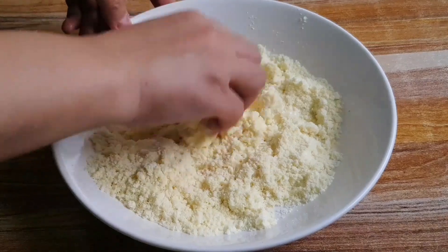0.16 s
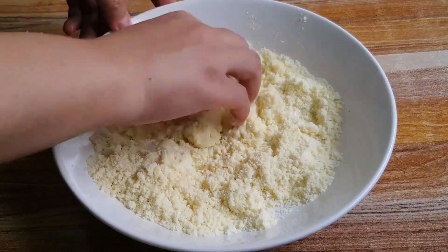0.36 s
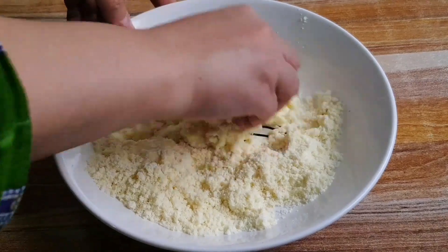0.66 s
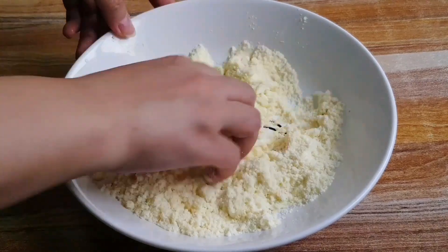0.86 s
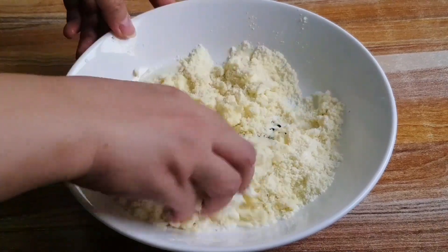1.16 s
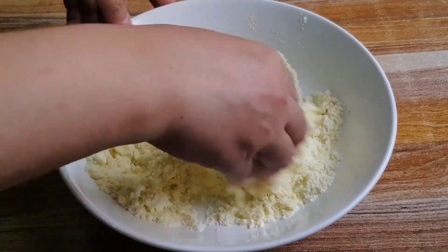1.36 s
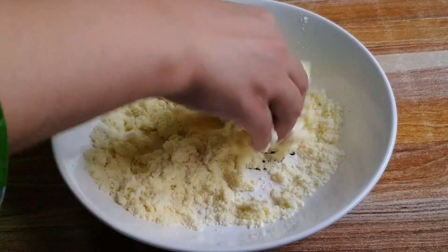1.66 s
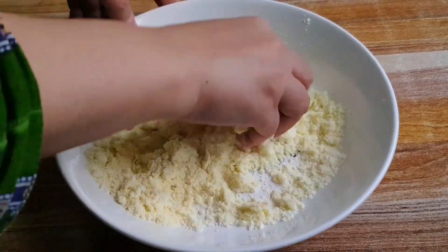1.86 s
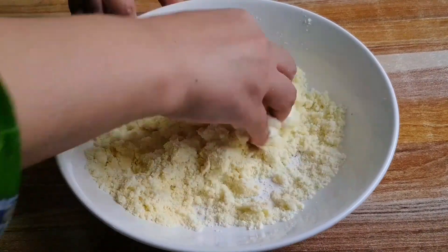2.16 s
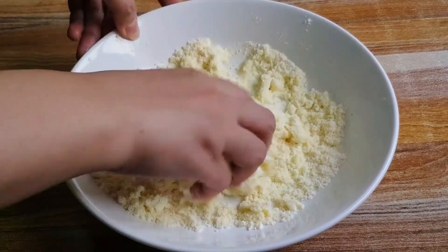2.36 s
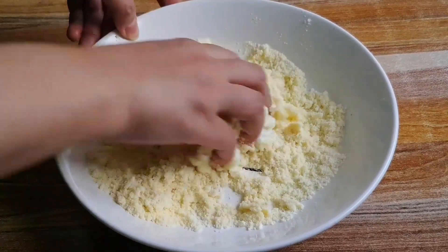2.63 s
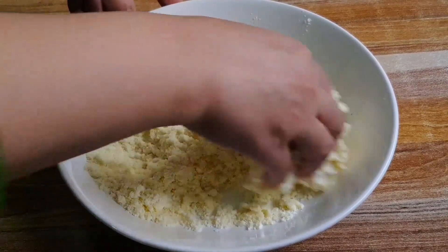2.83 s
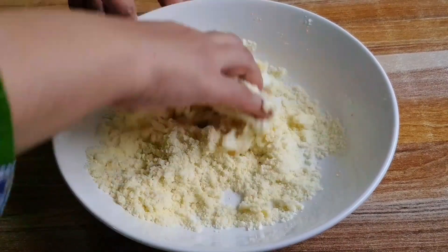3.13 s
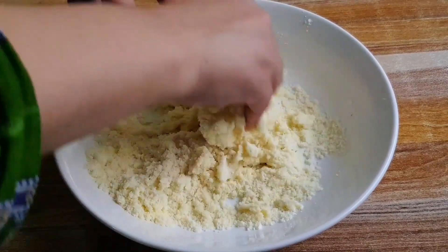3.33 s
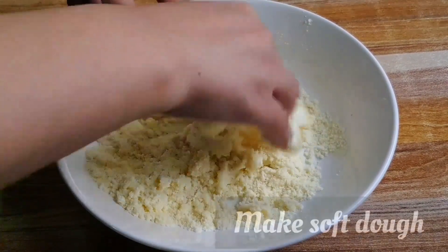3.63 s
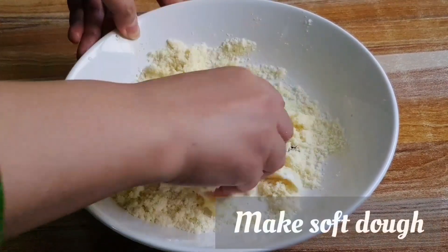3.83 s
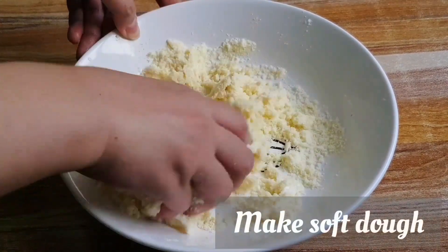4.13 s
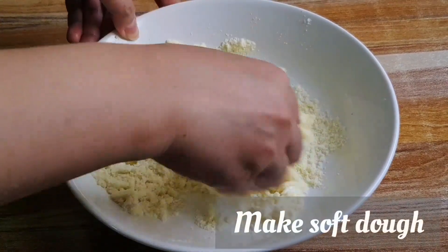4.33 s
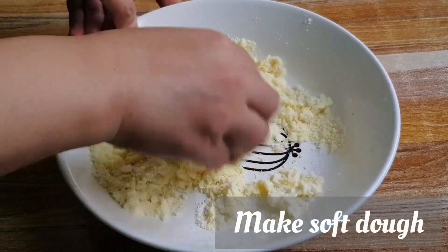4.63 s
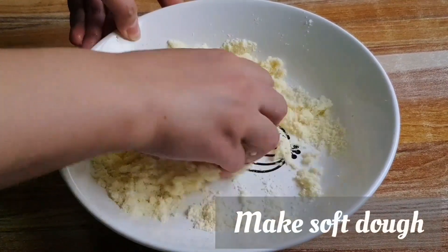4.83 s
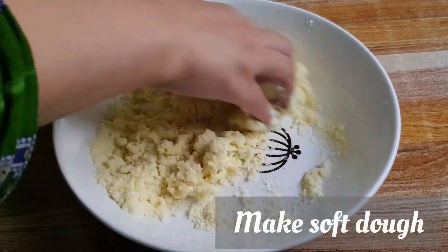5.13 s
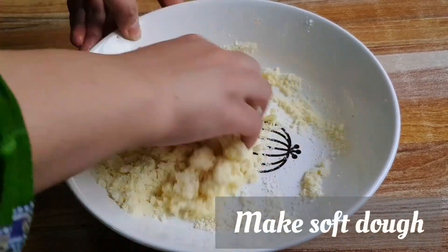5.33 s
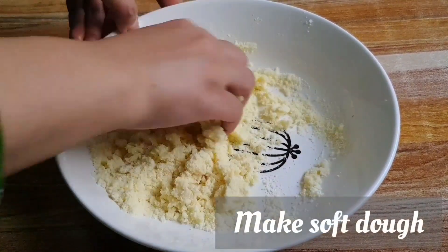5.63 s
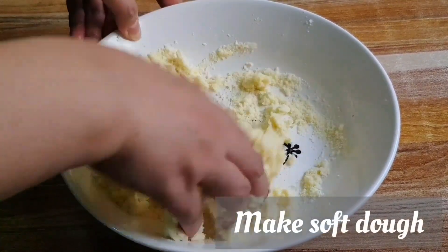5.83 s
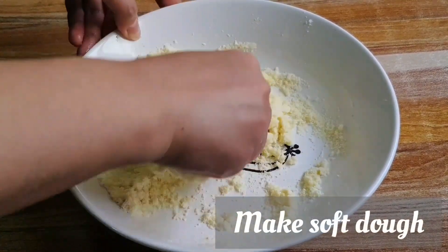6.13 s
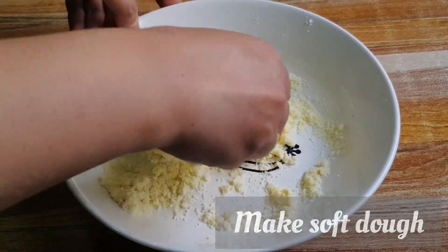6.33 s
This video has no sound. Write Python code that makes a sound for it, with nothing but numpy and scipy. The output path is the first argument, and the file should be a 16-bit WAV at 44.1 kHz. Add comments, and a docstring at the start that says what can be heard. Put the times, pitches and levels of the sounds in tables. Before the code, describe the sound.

From the start, fingers rub crumbly dough in a ceramic bowl, making soft, grainy rustles about three or four times a second. Behind them a small kitchen holds a low, wavering appliance hum, dull room noise, a faint hiss and a thin whine toward the right, with occasional very faint high peeps. The bowl taps lightly on a wooden table at 0.7 seconds, then rocks in a quick run of dull, hollow knocks from 1.5 to 1.7 seconds. One knock follows at 3 seconds. Between 3.7 and 5.2 seconds the knocks come in clusters, strongest around 4.5 and 5.1 seconds, some with a small crumble of breaking lumps. The knocks are close, short and barely ringing, clearly louder than the rustling. Afterward the quiet rubbing continues, with light scatters of crumbs around 5.8 and 6.2 seconds, ending at about 6.5 seconds.

```python
"""A hand rubs crumbly dough around a ceramic bowl on a wooden table in a small kitchen.
From the start, friction makes the crumbs rustle softly over an appliance's hum and whine, room noise,
a faint high hiss and occasional faint peeps. The pushed bowl taps at 0.7 s, rocks around 1.5 s and knocks
once at 3 s; each dull impact excites the modes of bowl and table. From 3.7 to 5.2 s the knocks come in
clusters, then the rubbing goes on with a last scatter of crumbs."""
import sys
import numpy as np
from scipy import signal
from scipy.fft import rfft, irfft
from scipy.io import wavfile

SR = 44100
rng = np.random.default_rng(int(sys.argv[2]) if len(sys.argv) > 2 else 0)


def pcm_store(signal):
    """Save signal as 16-bit PCM."""
    levels = np.round(np.clip(np.atleast_2d(signal), -1, 1) * 32767)
    wavfile.write(sys.argv[1], SR, levels.astype(np.int16).T)


N = 285768
T, HZ = np.arange(N) / SR, np.fft.rfftfreq(N, 1 / SR)


# Impacts of bowl on table: start_s, level_db, pitch_hz, thud_gain_db, room_gain_db, ring_gain_db,
# hollow_gain_db, tick_gain_db, ring_time_factor, thud_hz, main_mode_gain_db
IMPACTS = [(.703, -46, 650, -14, -13, -7, -10, -24, .8, 100, 2),
           (1.465, -31.5, 325, -1, -2.5, -6, 4, -16, 0.63, 108, -7),
           (1.481, -41.5, 260, 17.5, -8, -11, -6, -30, .59, 104, 0),
           (1.545, -27, 524, 6.5, 2.5, -6, -1, -33, .89, 103, 3),
           (1.578, -36, 474, 9, 3, 7, 5.5, -30, 0.51, 105, 0),
           (1.595, -40, 497, -2, -20, -10, 0, -32, 0.71, 109, -3),
           (1.706, -28, 396, 1.5, -1, -3.5, 4, -10.5, 1.06, 111, 1),
           (2.9824, -26.5, 556, 1, -5, -8.5, -3, -37, 1.14, 101, 5),
           (3.74, -34.5, 396, -3, -4, -2, -4, -23, 1.1, 90, -8),
           (3.843, -32.5, 496, 5, 1, 0.5, 2.5, -13, 0.85, 96, -6),
           (3.8559, -35, 620, 9.5, -4, -9, 0, -19, 0.76, 97, 0),
           (3.894, -41.5, 546, 1, 4, 1, 1, -36, 1.1, 95, 0),
           (4.104, -43, 282, 16.5, 2, 4, -5, -28, 0.85, 87, 12),
           (4.1225, -50, 356, -2, 12, -6, -10, -30, 1, 89.5, 0),
           (4.254, -33.5, 437, 5.5, -8.5, -2, -1, -20, .59, 85, -5),
           (4.403, -30, 420, -12, 0.5, 3, 10.5, -11.5, 0.57, 100, 1.5),
           (4.5271, -23, 576, -0.5, -5.5, -7, -9, -28, 0.99, 85, -11),
           (5.063, -39.5, 445, 6, 1, 5.5, 0, -11, 0.94, 94, -7),
           (5.148, -24, 640, 1, -2, -0.5, -3, -34, 0.86, 88.5, 6),
           (5.156, -32.5, 800, -12, -6, -4, -15, -18, 0.64, 95, 0),
           (5.182, -37, 520, 3, -8, 3, 5, -30, 0.79, 96, 4),
           (5.216, -39.5, 600, 4, -5, -2, 8, -30, 0.69, 95, 0)]
# Modes of the standing bowl: pitch_hz, gain_db, t60_s (before ring_time_factor)
BOWL_MODES = [(116, -7, .12), (200, -14, .1), (235, -8, .14), (285, -11, .14), (335, -9, .12),
              (409, -18, .16), (450, -19, .12), (1400, -13, .022), (501, -23, .17), (530, -22, .19),
              (690, -21, .12), (783, -21, .17), (918, -26, .2), (1090, -26, .18)]
# Modes of the hollow table top: pitch_hz, gain_db, t60_s
TABLE_MODES = [(224.6, -10.5, 0.17), (253, -13, 0.33), (308, -16.5, 0.2), (336.3, -11, 0.16)]
# Early reflections from walls and worktop: delay_s, signed_gain
REFLECTIONS = [(.0056, -0.32), (.0073, 0.083), (.0083, 0.14), (.0092, 0.057), (.0108, 0.055),
               (0.0126, 0.12), (.0195, -0.21), (.027, -0.043), (.036, 0.15)]
# Direct sound at the left and right microphone: gain_db
DIRECT_GAINS = [
    [0],
    [-2],
]

def bowl_knocks(thud_rise_s=.013, ring_rise_s=.00044, hollow_rise_s=.0042, tick_hz=1270, tick_s=.00094):
    """Impact excitation: each blow sets bowl and table into damped free vibration, and the walls echo."""
    lead_s = .004
    t = np.arange(SR // 2) / SR - lead_s
    age = np.maximum(t, 0)
    out = np.zeros((2, N))
    for (start_s, level_db, pitch_hz, thud_db, room_db, ring_db,
         hollow_db, tick_db, ring_time_factor, thud_hz, main_mode_db) in IMPACTS:
        # the dry tick of the bowl's foot
        tick = amp(tick_db) * np.exp(-(t / tick_s) ** 2) * np.cos(2 * np.pi * tick_hz * t)
        pulse = contact_pulse(t, pitch_hz) + tick
        direct = (contact_pulse(t, pitch_hz, force_share=.16) + tick) * amp(DIRECT_GAINS)
        # each mode is driven by the pulse's spectrum at its own frequency
        spectrum = abs(rfft(pulse))
        drive = spectrum / spectrum.max()
        bowl = BOWL_MODES + [(627, -14.5 + main_mode_db, .18)]  # the main mode varies with the spot hit
        modes = []
        for hz, db, t60 in bowl:
            decay = amp(db - 60 * age / (t60 * ring_time_factor))  # the hand's grip sets the damping
            modes.append(decay * drive[int(hz * len(t) / SR)] * np.cos(2 * np.pi * hz * age))
        weights = rng.uniform(.7, 1.3, len(bowl))  # the bowl lands on another spot of its foot each time
        ring = amp(ring_db) * (weights @ np.array(modes)) * onset(age, ring_rise_s)
        # the heavy table top takes a cycle or two to get going
        swell = age / thud_rise_s
        thud = amp(thud_db - 9) * (swell * np.exp(1 - swell)) ** 2 * np.cos(2 * np.pi * thud_hz * age)
        hollow = sum(amp(db - 60 * age / t60) * np.cos(2 * np.pi * (hz * age + rng.random()))
                     for hz, db, t60 in TABLE_MODES)
        hollow = amp(hollow_db) * hollow * onset(age, hollow_rise_s)
        echoes = sum(gain * contact_pulse(t - delay_s, pitch_hz) for delay_s, gain in REFLECTIONS)
        room = amp(room_db) * (echoes + reverberation(pulse[None], gain_db=-3))
        add(out, start_s - lead_s, amp(level_db) * (direct + thud + hollow + ring + room))
    # a high-pass keeps the knocks free of DC offset and deep rumble
    return signal.sosfilt(signal.butter(2, 28, "highpass", fs=SR, output="sos"), out)


def contact_pulse(t, pitch_hz, force_share=0, cutoff_hz=1900, smoothness=30):
    """Radiation: a cushioned force is heard as its second derivative and, close by, partly as itself."""
    pulse_time = np.maximum(smoothness - .7 + t * 2 * np.pi * pitch_hz / np.sqrt(2 / (smoothness - 1)), 0)
    force = pulse_time ** smoothness * np.exp(-pulse_time)
    pressure = -np.gradient(np.gradient(force))
    pressure = low_pass(pressure, cutoff_hz, order=8)  # the dough damps the bowl's treble
    return pressure / pressure.max() + force_share * force / force.max()


# Finger strokes through the dough: peak_s, level_db, length_s, coarse_gain_db, flour_gain_db
STROKE_PEAKS = [(0.12, -65, 0.083, -4, -2), (.34, -77, .08, -2, 2), (.58, -73.5, .081, -1, -5),
                (0.84, -77, 0.15, -2, -6), (1.155, -71.5, 0.13, -1.5, -4), (1.473, -69, .1, -4.5, -7),
                (1.577, -73.5, .06, 5, -4), (1.74, -69, 0.16, -1, 0), (1.89, -84, .06, 3, -2),
                (2.048, -69.5, 0.12, 0.5, 0), (2.334, -71, .17, -1, -4), (2.658, -75, 0.17, 1, -2),
                (2.94, -68.5, .18, -6, -2), (3.196, -74, 0.23, -4, -2), (3.49, -74.5, 0.12, 1, 1),
                (3.776, -72.5, 0.19, -0.5, -6), (3.96, -81, 0.17, -1, 9), (4.144, -69.5, .21, -3.5, -3),
                (4.482, -68.5, 0.14, 0.5, -1), (4.779, -67, 0.13, -3.5, -3),
                (5.11, -70.5, 0.35, -0.5, -1.5), (5.296, -73, .11, -7, -3), (5.597, -76.5, 0.24, -1, -1),
                (5.933, -69, 0.26, -6, -4), (6.217, -68, 0.098, -3, -2), (6.37, -78, .05, -3, 10)]

def finger_strokes(coarse=False, flour=False, press_share=.41, roundness=1.8, resting_db=-96):
    """Incoherent sources add in power: the envelope of strokes that each press in and let go."""
    power = amp(resting_db) ** 2
    for peak_s, level_db, length_s, coarse_db, flour_db in STROKE_PEAKS:
        from_peak = np.maximum((peak_s - T) / press_share, (T - peak_s) / (1 - press_share)) / length_s
        peak = amp(level_db + coarse * coarse_db + flour * flour_db)
        power = power + (peak * np.exp(-np.minimum(from_peak, 10) ** roundness)) ** 2
    return np.sqrt(power)


# Spectrum of rubbed crumbs: frequency_hz, gain_db
RUSTLE_SPECTRUM = [(500, -31), (1200, 2.5), (2200, 0), (2700, -1.5), (3300, 2.5), (4550, -4), (4950, 5),
                   (5600, 1), (6750, 2.5), (7250, 0.5), (7850, -1.5), (8600, 3), (9300, -2.5), (13000, 3.5),
                   (16000, -10.5)]

def dough_rustle(gain_db=4, clump_db=1.8, coarse_below_hz=4270, flour_above_hz=9800):
    """Friction noise: crumbs slip under the fingers in uneven clumps, and finer grains sound higher."""
    rustle = colour(crumb_slips(per_s=3500, spread_db=-.5), RUSTLE_SPECTRUM) * amp(clump_db * drift(27))
    coarse = low_pass(rustle, coarse_below_hz, order=6)
    flour = rustle - low_pass(rustle, flour_above_hz, order=12)
    small = rustle - coarse - flour
    return amp(gain_db) * (coarse * finger_strokes(coarse=True) + small * finger_strokes()
                           + flour * finger_strokes(flour=True))


# Lumps that break: start_s, level_db, rise_s, t60_s, centre_hz, width_octaves
LUMP_BREAKS = [(.095, -57, 0.021, 0.15, 11000, 0.67), (1.09, -58, .02, 0.2, 12000, 0.71),
               (1.545, -65, .004, 0.18, 1700, 0.93), (1.703, -59, .002, 0.26, 4300, 0.97),
               (1.702, -61, 0.0035, 0.14, 11000, 0.63), (3.69, -59, 0.022, 0.26, 11700, 0.63),
               (3.842, -64, .004, 0.14, 2190, 0.91), (4.514, -55.5, .004, 0.4, 4370, 0.68),
               (4.527, -59, 0.0036, .12, 1800, 0.6), (4.78, -59, .005, 0.085, 3200, 0.89),
               (5.151, -51, .003, 0.048, 1700, 0.51), (5.83, -55, 0.033, 0.35, 11900, 0.84),
               (5.93, -64.5, .015, 0.36, 2860, 0.68), (6.18, -56, 0.024, .22, 12000, .6)]

def breaking_lumps():
    """Fracture: each lump scatters crumbs over the glaze in a decaying burst of band-limited noise."""
    scatter = rfft(crumb_slips(per_s=9000, spread_db=3))
    out = np.zeros((2, N))
    for start_s, level_db, rise_s, t60_s, centre_hz, width_octaves in LUMP_BREAKS:
        age = np.maximum(T - start_s, 0)
        band = np.exp(-(np.log2((HZ + 1) / centre_hz) / width_octaves) ** 2)
        out += amp(level_db - 60 * age / t60_s) * onset(age, rise_s) * unit(irfft(scatter * band, N))
    return out


def crumb_slips(per_s, spread_db):
    """A Poisson process: tiny slips of uneven size reach each microphone as random impulses."""
    size = amp(spread_db * np.minimum(rng.exponential(1, (2, N)), 4))
    return unit(size * rng.standard_normal((2, N)) * (rng.random((2, N)) < per_s / SR))


# Spectrum of the kitchen's reverberation: frequency_hz, gain_db
REVERB_SPECTRUM = [(100, -5), (200, 18.5), (330, 4.5), (480, 5.5), (700, 1.5), (1000, 3), (1300, -2.5),
                   (2000, 14), (4000, -2.5), (14000, -19)]
# Its decay times: frequency_hz, t60_s
REVERB_TIMES = [(100, 0.34), (300, 0.2), (700, 0.26), (2000, 0.22), (8000, 0.21)]

def reverberation(sound, gain_db, gap_s=.00475, build_s=.00053):
    """Reverberation: dense reflections build up after a gap and decay exponentially in each band."""
    hz, t, bands = signal.stft(diffuse_field(SR // 2), SR, nperseg=256)
    decay = amp(at_frequency(REVERB_SPECTRUM, hz)[:, None]
                - 60 * t / at_frequency(REVERB_TIMES, hz)[:, None])
    tail = signal.istft(bands * decay, SR)[1]
    age = np.maximum(np.arange(tail.shape[1]) / SR - gap_s, 0)
    tail *= 1 - np.exp(-age / build_s)
    tail /= np.linalg.norm(tail[0])
    return amp(gain_db) * signal.fftconvolve(sound, tail, axes=1)[:, :sound.shape[1]]


# Swells and dips of the low 58 Hz hum: time_s, gain_db
LOW_HUM_SWELLS = [(0, -48.5), (.22, -69), (.38, -45), (.46, -48), (.56, -47), (.93, -46), (1.2, -46),
                  (1.33, -59), (1.65, -45.5), (2.4, -77), (2.65, -58), (2.85, -49), (2.95, -62), (3.1, -53),
                  (3.27, -54), (3.38, -43), (3.78, -39.5), (4.1, -44.5), (4.75, -52), (5.28, -49),
                  (5.45, -73), (5.6, -46), (5.72, -53), (5.82, -47.5), (5.95, -43), (6.32, -44),
                  (6.48, -76)]
# Swells and dips of the tone about an octave up: time_s, gain_db
OCTAVE_SWELLS = [(0, -50), (.75, -50.5), (1.2, -48.5), (1.52, -58), (1.9, -49), (2.3, -53), (2.8, -52.5),
                 (2.96, -38.5), (3.28, -62), (3.86, -42.5), (4.3, -52.5), (4.7, -46), (5.5, -52),
                 (5.78, -53), (6.25, -59), (6.48, -43)]
# Faint tones of constant level: pitch_hz, level_db
MOTOR_TONES = [(916, -78), (1030, -79)]

def appliance_hum():
    """Periodic vibration: a motor radiates a low hum with wavering, nearly harmonic overtones."""
    hum = amp(-3.5) * envelope(LOW_HUM_SWELLS) * tone(58.06, waver_hz=.57, rate_hz=6.4)
    octave_gain = amp(-3) * envelope(OCTAVE_SWELLS) * (1 + .83 * drift(3.8))
    hum += octave_gain * tone(116.6, waver_hz=3.45, rate_hz=7.46)
    hum += amp(-55) * (1 + .33 * drift(20)) * tone(228, waver_hz=8.7, rate_hz=23.3)
    return hum + sum(amp(db) * tone(hz, waver_hz=6, rate_hz=15) for hz, db in MOTOR_TONES)


# Envelope of the whine, with brief dips: time_s, gain_db
WHINE_ENVELOPE = [(0, 4), (.58, 3.6), (.66, -1), (.75, 3.5), (1.5, 4), (2.2, 3.2), (2.42, 1), (2.5, -2.5),
                  (2.6, 4.5), (2.85, 2), (3.25, 2), (3.38, -2), (3.5, 1), (3.65, -1.5), (3.95, 2),
                  (4.33, -1), (4.5, 2), (4.95, 2), (5.3, -2), (5.7, -4), (5.96, 2.5), (6.48, -1)]
# The whine at the left and right microphone: gain_db
WHINE_GAINS = [
    [-10],
    [4.5],
]

def appliance_whine(pitch_hz=1851, sway_hz=5, sways_per_s=2.7, gain_db=-75):
    """Standing waves bring a thin, frequency-modulated tone unequally to the two microphones."""
    right = tone(pitch_hz + sway_hz * np.sin(2 * np.pi * sways_per_s * T), waver_hz=3.96, rate_hz=25)
    flutter = 1 + .14 * drift(25)
    lead_rad = .7 + .6 * drift(2.5)  # the standing waves shift as the arm moves
    left = (signal.hilbert(right) * np.exp(1j * lead_rad)).real
    return amp(gain_db) * envelope(WHINE_ENVELOPE) * flutter * np.array([left, right]) * amp(WHINE_GAINS)


# Faint high peeps: peak_s, level_db, length_s
PEEP_SWELLS = [(.87, -80, .08), (2.07, -78.5, .1), (2.4, -78.5, .1), (2.67, -77.5, .09), (3.21, -79.5, .1),
               (4.54, -73, .08), (5.292, -72, .06), (5.99, -79, .1)]

def peeps(pitch_hz=2150, half_width_hz=50, gain_db=6):
    """Narrow-band noise is heard as a fuzzy pitch; each brief swell of it makes a peep."""
    swell = sum(amp(db) * np.exp(-(2 * (T - peak_s) / length_s) ** 2)
                for peak_s, db, length_s in PEEP_SWELLS)
    band = 1 / (1 + ((HZ - pitch_hz) / half_width_hz) ** 2)
    fuzz = irfft(rfft(rng.standard_normal((2, N))) * band, N)
    return amp(gain_db) * swell * unit(fuzz)


# Spectrum of the moving air: frequency_hz, gain_db
AIR_SPECTRUM = [(20, -41.5), (45, -5), (85, -4.5), (150, -10.5), (225, 3.5), (262, -5), (290, -4),
                (325, -7), (400, -8.5), (600, -19.5), (750, -22.5), (1000, -24), (1200, -25.5), (1700, -30),
                (1950, -29.5), (2250, -39.5), (2750, -37), (4200, -48.5), (9000, -51.5)]
# Its slow changes of level: time_s, gain_db
AIR_ENVELOPE = [(0, 0.34), (1.6, 0.2), (2.4, -0.33), (3.4, -0.26), (4.4, 0.5), (5.6, 0), (6.48, 0)]

def room_air(gain_db=-47):
    """Ambient noise: moving air fills the room with a dull, diffuse sound."""
    return amp(gain_db) * envelope(AIR_ENVELOPE) * colour(diffuse_field(N), AIR_SPECTRUM)


# Likeness of the room's sound at the two microphones: frequency_hz, correlation
COHERENCE = [(60, 0.9), (200, 0.98), (300, 0.9), (640, 0.4), (1400, 0), (3000, 0.00084)]

def diffuse_field(samples):
    """Spatial coherence: diffuse noise is alike at two close points only at long wavelengths."""
    mid, side = rfft(rng.standard_normal((2, samples)))
    correlation = at_frequency(COHERENCE, np.fft.rfftfreq(samples, 1 / SR))
    mid *= np.sqrt((1 + correlation) / 2)
    side *= np.sqrt((1 - correlation) / 2)
    return irfft(np.array([mid + side, mid - side]), samples)


# Faint high background hiss with a dip near 8.5 kHz: frequency_hz, gain_db
HISS_SPECTRUM = [(1000, -18), (4000, -3), (5300, 2), (7000, -4.5), (8500, -14), (10000, 2.5), (11800, 6.5),
                 (16000, 7)]

def background_hiss(gain_db=-67.5, waver_db=.4):
    """Broadband noise: a faint high hiss, uncorrelated left and right, wavers slightly in level."""
    return colour(rng.standard_normal((2, N)), HISS_SPECTRUM) * amp(gain_db + waver_db * drift(12))


def amp(db):
    """Decibels to amplitude ratio."""
    return 10 ** (np.asarray(db) / 20)


def unit(x):
    """Normalisation to rms 1."""
    return x / np.sqrt(np.mean(x ** 2) + 1e-20)


def at_frequency(points, hz):
    """Interpolation of a table over log frequency."""
    frequency_hz, value = np.transpose(points)
    return np.interp(np.log(hz + 1), np.log(frequency_hz + 1), value)


def envelope(rows):
    """Amplitude over time from rows of time_s, gain_db."""
    return amp(np.interp(T, *np.transpose(rows)))


def onset(age, rise_s):
    """A smooth attack from 0 to 1."""
    return 1 - np.exp(-(age / rise_s) ** 2)


def colour(x, spectrum):
    """Spectral shaping, normalised to rms 1."""
    return unit(irfft(rfft(x) * amp(at_frequency(spectrum, HZ)), N))


def low_pass(x, cutoff_hz, order):
    """Zero-phase attenuation of the treble."""
    hz = np.fft.rfftfreq(x.shape[-1], 1 / SR)
    return irfft(rfft(x) / (1 + (hz / cutoff_hz) ** order), x.shape[-1])


def drift(rate_hz):
    """Slow Gaussian fluctuation of rms 1."""
    return unit(irfft(rfft(rng.standard_normal(N)) * np.exp(-(HZ / rate_hz) ** 2), N))


def tone(hz, waver_hz, rate_hz):
    """Random frequency modulation of a sine of rms 1."""
    return np.sqrt(2) * np.sin(2 * np.pi * np.cumsum(hz + waver_hz * drift(rate_hz)) / SR)


def add(mix, start_s, sound):
    """Superposition of a sound on the mix from a given time."""
    part = mix[..., max(round(start_s * SR), 0):][..., :sound.shape[-1]]
    part += sound[..., :part.shape[-1]]


def scene():
    """Superposition: bowl and dough sound in front of the kitchen's background."""
    knocks = bowl_knocks()
    dough = dough_rustle() + breaking_lumps()
    dough += reverberation(dough, gain_db=-5)
    return knocks + dough + peeps() + appliance_hum() + appliance_whine() + room_air() + background_hiss()


def record(dry, imbalance_db=.4, cutoff_hz=15800):
    """Transduction: the left microphone is slightly more sensitive, and both are band-limited."""
    band_limit = signal.firwin(701, cutoff_hz, window=("kaiser", 9), fs=SR)
    sensitivity = amp([[imbalance_db], [-imbalance_db]])
    return signal.oaconvolve(dry * sensitivity, band_limit[None], "same", axes=1)


dry = scene()
out = record(dry)
pcm_store(out)
```